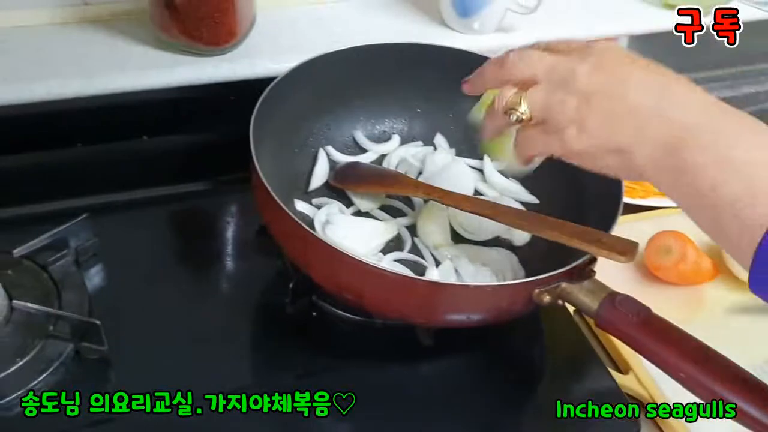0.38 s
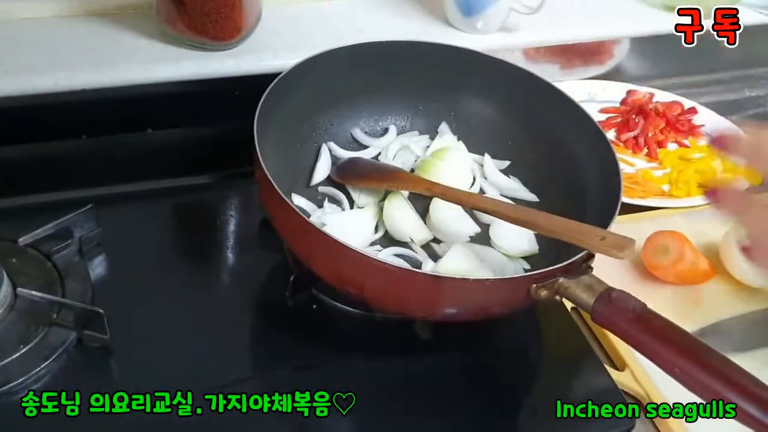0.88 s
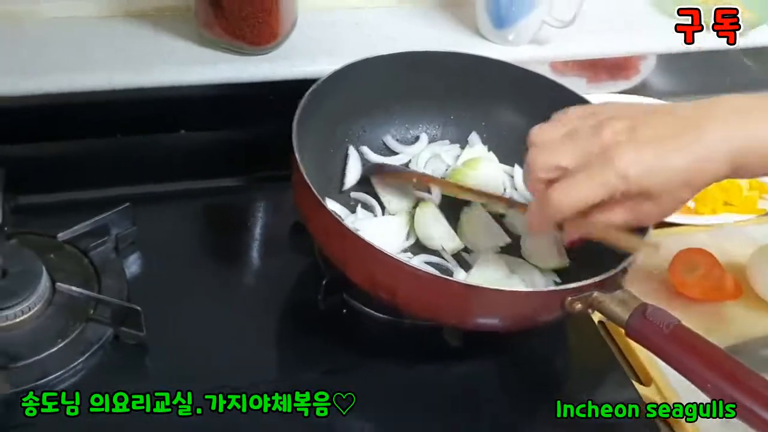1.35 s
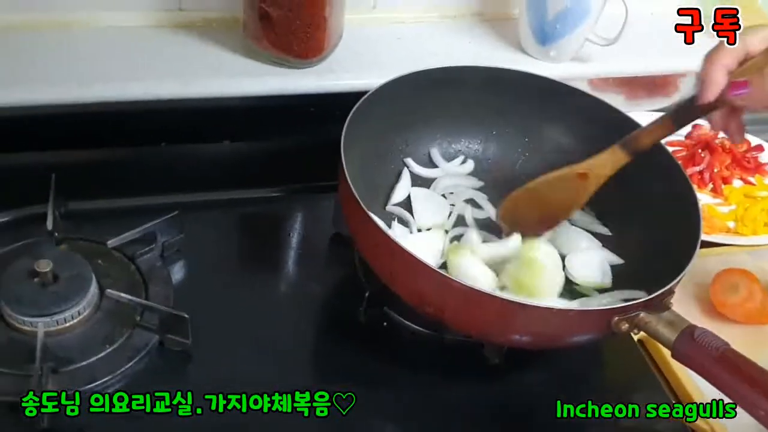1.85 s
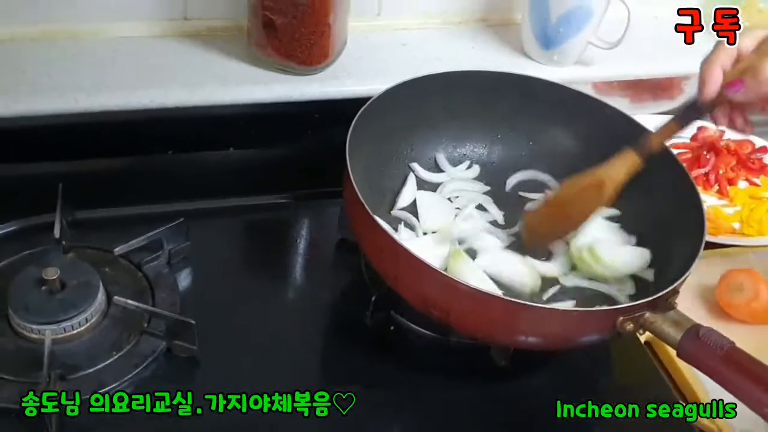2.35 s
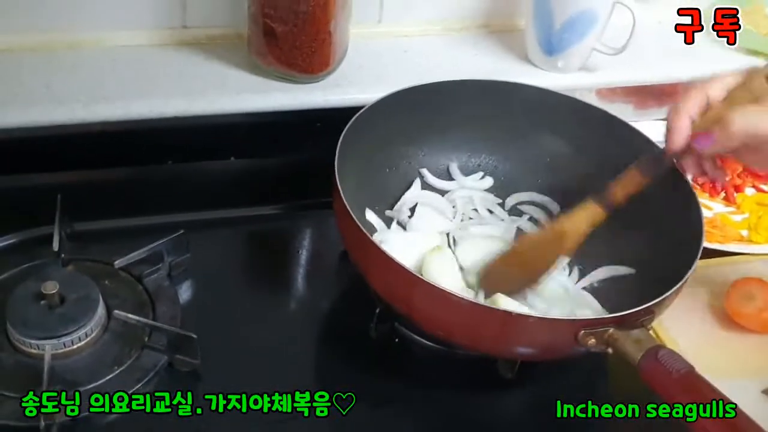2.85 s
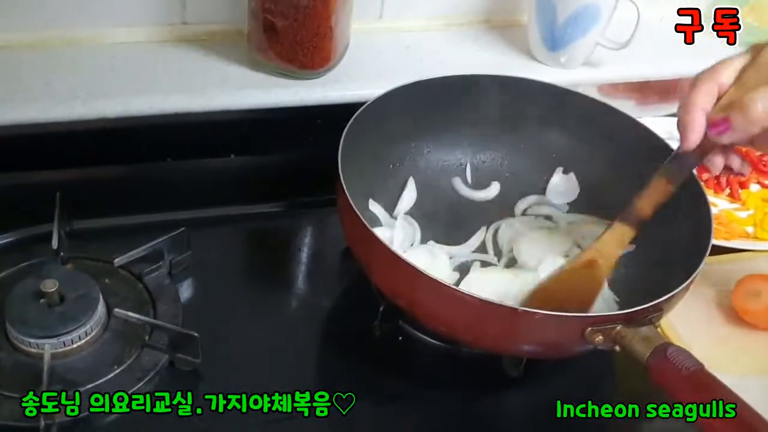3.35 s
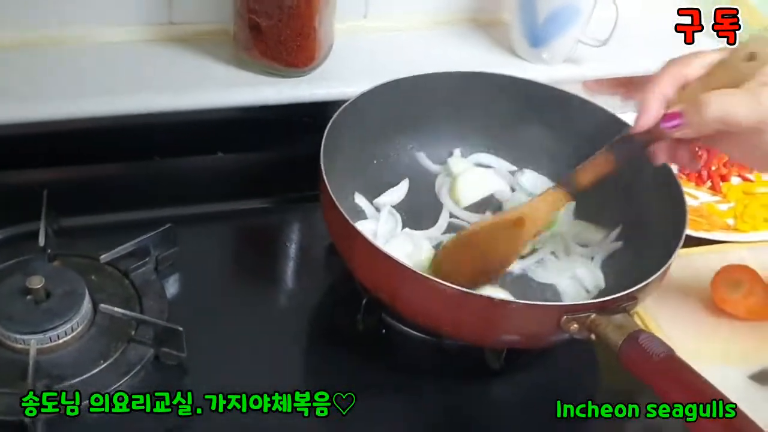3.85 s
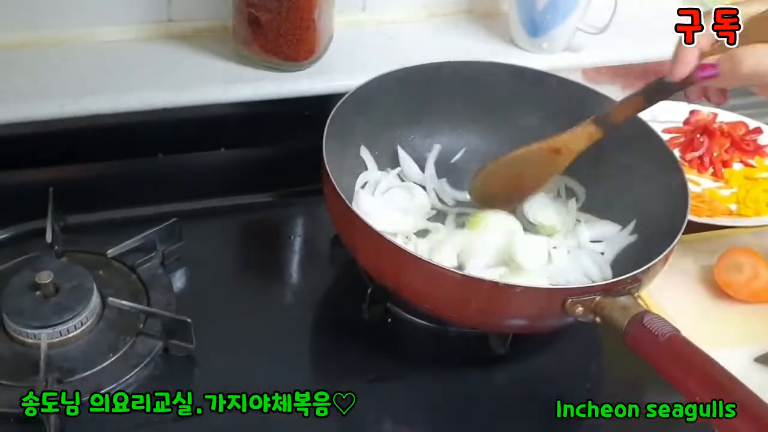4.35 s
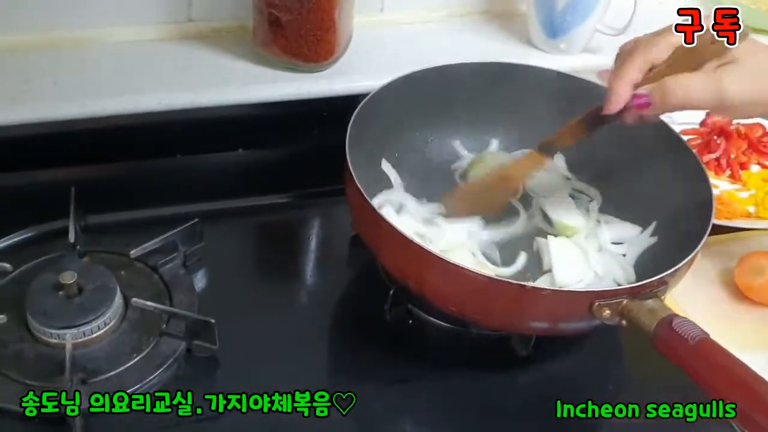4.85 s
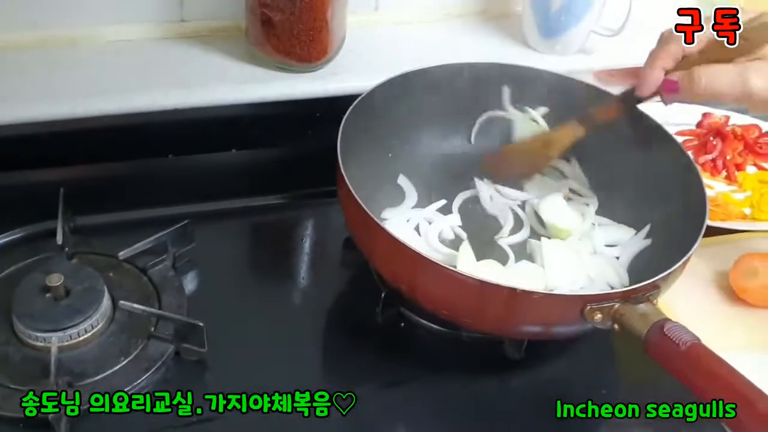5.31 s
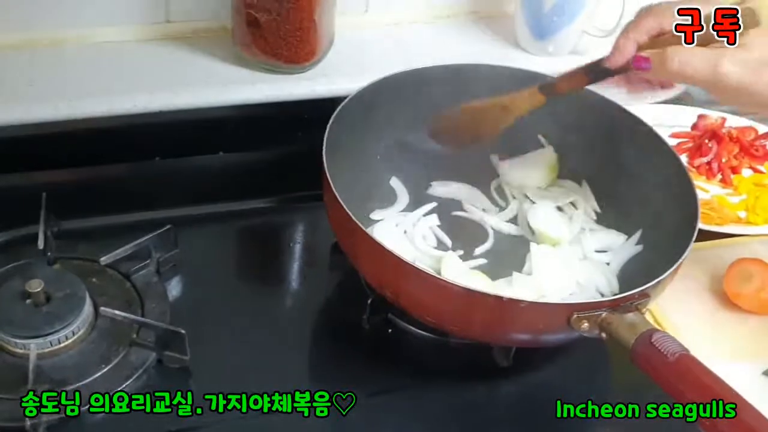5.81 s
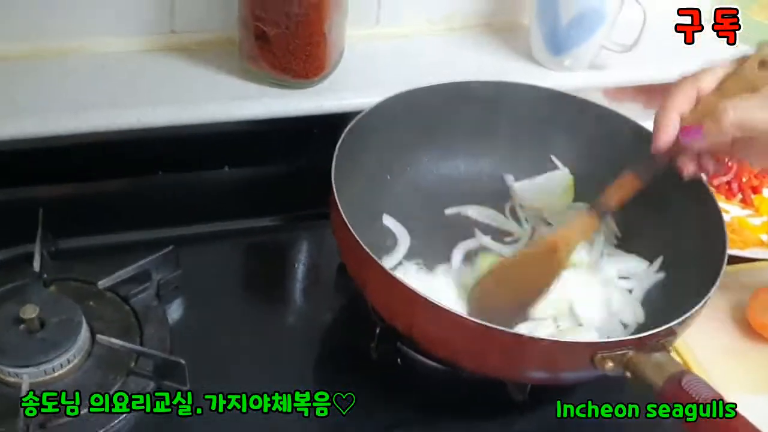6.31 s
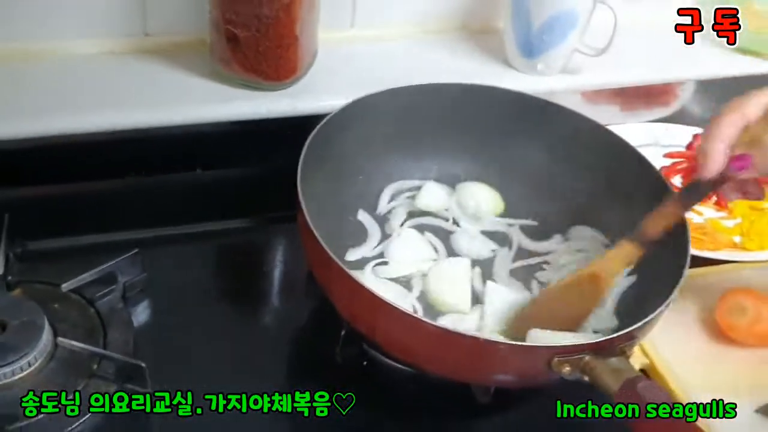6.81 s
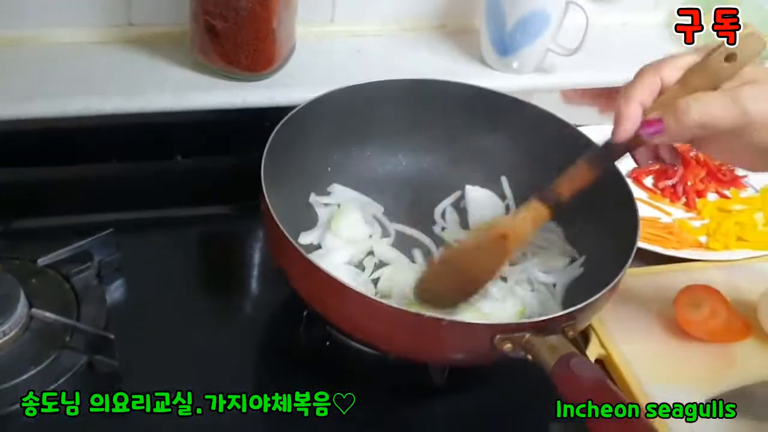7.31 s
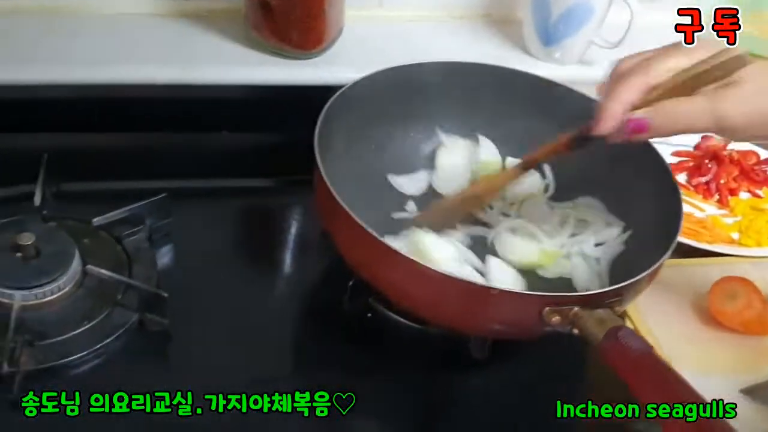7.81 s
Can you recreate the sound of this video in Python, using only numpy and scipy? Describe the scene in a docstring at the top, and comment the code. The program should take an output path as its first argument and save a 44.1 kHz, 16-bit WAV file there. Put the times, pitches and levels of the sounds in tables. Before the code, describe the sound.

Sliced onions sizzle in hot oil with dense crackle and loud spits while wood knocks a ringing metal pan in a small kitchen.

```python
"""Sliced onions sizzle in hot oil: dense crackle over hiss, with a few loud spits. The place is a small
kitchen with a deep frying pan on a gas stove, a phone close by. The sizzle is random clicks bouncing in
the pan plus noise; spits are short bursts of filtered noise. Onion lumps and a wooden spatula knock the pan,
which rings briefly as decaying modes; stirring shoves it on its stand and rumbles the stove top, as noise
through resonances and decaying low tones. A faint murmur of room and burner lies below."""
import sys
import numpy as np
from scipy import signal
from scipy.fft import rfft, irfft, next_fast_len
from scipy.io import wavfile
from scipy.ndimage import uniform_filter1d

SR = 44100
rng = np.random.default_rng(int(sys.argv[2]) if len(sys.argv) > 2 else 0)


def elevation(decibels):
    """Turn decibel levels (scalar or array-like) into linear amplitude ratios."""
    levels = np.asarray(decibels, float)
    return 10 ** (levels / 20)


def waveform_to_disk(signal):
    """Save audio, clipped to [-1, 1], as 16-bit WAV at the path in sys.argv[1]."""
    frames = np.transpose(np.atleast_2d(signal))
    scaled = np.clip(frames, -1, 1) * 32767
    samples = np.round(scaled).astype(np.int16)
    wavfile.write(sys.argv[1], SR, samples)


N = 360738
TIME = np.arange(N) / SR

# Sizes of steam bubble, large to fine: pitch_hz [Hz], width_oct [octaves],
# bursts_per_s [1/s, before the flurries], crackle_db [dB, before the crackle setting is added]
BUBBLE_SIZES = [(1970, 0.92, 250, 4), (2930, 1.11, 45, 0.5), (3970, 1.9, 340, 0.5), (8700, 0.61, 600, 11.5),
                (12290, 0.31, 760, 14)]
LOUDEST_BURST_DB = 12  # over the faintest


def sizzle(spread_db=5.0, crackle_db=-1, flurry_db=2.5, shared=0.26, flicker_db=3.5, surge_db=0.84, spots=5):
    """Bubbles of each size burst in flurries, mostly faint and some loud; the finest merge into hiss."""
    out = 0
    boil = walk(13)
    for pitch_hz, width_oct, bursts_per_s, size_db in BUBBLE_SIZES:
        chance, sign, strength = rng.random((3, N))
        flurry = elevation(flurry_db * (shared * boil + walk(45)))
        bursts = (chance < bursts_per_s * flurry / SR) * np.sign(sign - .5)
        burst_db = np.minimum(-spread_db * np.log(strength + 1e-9), LOUDEST_BURST_DB)
        clicks = bursts * elevation(burst_db)
        # each spot of the pan bounces its bursts its own way
        spot = rng.integers(spots, size=N)
        crackle = sum(bowl(clicks * (spot == k), 2.9, 0.07) for k in range(spots))
        crackle = level(crackle, crackle_db + size_db)
        hiss = rng.standard_normal((2, N)) * elevation(flicker_db * walk(25))
        # bubbles of one size swell and ebb together
        surge = elevation(surge_db * walk(17))
        band = lambda f: np.exp(-(np.log2(f / pitch_hz) / width_oct) ** 2)
        out = out + shape(surge * (crackle + hiss), band)
    return out


def bowl(clicks, echo_db, t60):
    """Clicks and their bounce inside the pan, as a mid and a side signal."""
    bounce = elevation(echo_db) * tail(t60, 0.002)[:, :SR // 8]
    bounce[:, 0] = 1, 0.33 * rng.standard_normal()  # the direct click
    return signal.fftconvolve(clicks[None], bounce, axes=1)[:, :N]


# Water drops spitting in the oil: start_s [s], middle_db [dB, peak near 7.5 kHz],
# low_db [dB, peak near 3 kHz], high_db [dB, peak near 12.5 kHz], pan_db [dB, left minus right]
SPIT_DROPS = [(0.045, -12.5, -21.5, -10.5, 4), (0.1364, -14, -18, -28, 0), (0.22, -15, -31, -26, 5),
              (0.3844, -16, -23, -27, 8), (0.8024, -21, -32, -18, 3.5), (0.9027, -23, -17, -21, 5),
              (0.9334, -15, -28, -28, 2.5), (0.995, -17, -18, -28, 0), (1.024, -17, -13, -28, 2),
              (1.121, -14, -30, -26, 0), (1.4, -12.5, -23, -27, 3), (1.5804, -24, -18, -26, 3.0),
              (1.6108, -18, -15, -25, 5), (1.732, -13, -31, -25, 0), (1.824, -12, -15, -22, 3.5),
              (1.832, -24, -19, -13, 2), (1.935, -21, -17, -27, 1), (1.9819, -18, -32, -9, 0),
              (2.1518, -7.5, -10.5, -25, 2), (2.5065, -9, -19, -24, 0), (3.0515, -13, -11.5, -24, 5),
              (3.0567, -7, -18, -22, 11), (3.1834, -24, -20, -13, 3.5), (3.264, -10, -24, -22, 9),
              (3.3518, -17, -16, -20, -3), (3.7223, -9, -15, -23, 3.5), (3.608, -24, -29, -8, 2),
              (3.767, -22, -12, -20, -3), (3.9024, -12, -15, -8.5, 5), (4.0224, -15, -22, -23, -4),
              (4.0976, -9, -13, -18, 2.0), (4.1586, -6, -9, -22, -2), (4.2136, -11, -21, -22, 4),
              (4.329, -21.5, -24, -23, 0), (4.4197, -13, -20, -26, 0), (4.463, -24, -13, -22, -2),
              (4.559, -16, -29, -23, 2), (4.609, -18, -12.5, -24, 2.5), (4.7007, -13, -19, -25, 0),
              (4.7844, -23, -21, -24, 2.5), (4.881, -8, -12, -5, 7), (5.2475, -16, -20, -24, 3.0),
              (5.3218, -20, -17, -11, 1), (5.4456, -20, -25, -19, 3.5), (5.584, -17, -19, -25, 1.0),
              (6.054, -17, -18, -26, 2), (6.0692, -2, -10.5, -5, 2), (6.531, -7, -32, -6, 3.5),
              (6.561, -16, -31, -10, 2), (6.8905, -26, -20, -27, 0), (7.0429, -12, -26, -15, 5),
              (7.185, -12, -30, -19, 3.5), (7.373, -8.5, -13, -24, 4), (7.647, -9.5, -17, -16, -3),
              (7.67, -4.5, -9.5, -7, -1), (7.8554, -11, -16, -9, 1), (8.0341, -22, -27, -16, 3.5),
              (8.14, -15, -29, -22, 3.5)]
# Middle, low and high part of a spit: from_hz [Hz], to_hz [Hz]
SPIT_RANGES = [(5660, 9300), (1850, 5140), (10400, 14100)]


def spits():
    """A sharp click followed by some ms of spatter, each drop with its own colour."""
    out = np.zeros((2, N))
    t = np.arange(int(0.052 * SR)) / SR
    click = np.exp(-(t / 0.00083) ** 2)
    spatter = elevation(-12) * (t > .002) * np.exp(-(t / 0.011) ** 4)
    bands = [signal.butter(2, edges, "band", fs=SR, output="sos") for edges in SPIT_RANGES]
    for start_s, middle_db, low_db, high_db, pan_db in SPIT_DROPS:
        noise = rng.standard_normal((2, len(t))) * (click + spatter)
        parts = [signal.sosfilt(band, noise) for band in bands]
        levels_db = middle_db, low_db, high_db
        mid, side = sum(elevation(db) * x / np.max(np.abs(x[0])) for x, db in zip(parts, levels_db))
        left = elevation(pan_db / 2) * (mid + 0.58 * side)
        right = elevation(-pan_db / 2) * (mid - 0.58 * side)
        add(out, np.array([left + right, left - right]) / 2, start_s)
    return out


# The course of the frying: start_s [s], level_db [dB, finer bubbles],
# large_db [dB, larger bubbles against level_db]
FRYING_COURSE = [(0.0, -29, -10.5), (0.36, -28.5, -9.5), (0.84, -26.5, -10), (1.34, -27.5, -11.5),
                 (1.98, -26, -7.5), (2.8, -25, -6.5), (3.44, -22, -8), (3.67, -22.5, -10),
                 (3.89, -24.5, -8.5), (4.15, -24, -9), (5.49, -24.5, -8), (6.04, -27, -9),
                 (6.33, -26, -9.5), (6.58, -23.5, -10.5), (8.18, -24.5, -8)]
# Colour of the sizzle at the middle: pitch_hz [Hz], level_db [dB per Hz, before the colour share]
MIDDLE_COLOUR = [(560, -51), (920, -7.5), (1060, -4), (1420, -11.5), (1760, -5.5), (2110, -5.5),
                 (2340, -9.5), (2560, -8.5), (3110, -8.5), (4640, -1.5), (6160, -5.5), (6800, -6.5),
                 (7740, -1.5), (8600, -13.5), (9840, -15), (11300, -14), (12100, -9), (14500, -7)]
# Colour of the sizzle at the sides: pitch_hz [Hz], level_db [dB per Hz, before the colour share]
SIDE_COLOUR = [(560, -24), (950, -6.5), (1060, -7.5), (1290, -14.5), (1760, -10), (1900, -11),
               (2450, -14.5), (3610, -5), (6310, -3), (7570, -5.5), (10100, -26), (12200, -18),
               (14500, -19)]
SIZZLE_SIDE_DB, TOP_HZ = 0.5, 14700


def frying():
    """Sizzle in the colour of pan and microphone, on its curve, plus spits; all ends above TOP_HZ."""
    start_s, level_db, large_db = np.transpose(FRYING_COURSE)
    mid, side = sizzle()
    bed = np.array([colour(mid, MIDDLE_COLOUR), elevation(SIZZLE_SIDE_DB) * colour(side, SIDE_COLOUR)])
    large = shape(bed, lambda f: 1 / (1 + (f / 4200) ** 4))
    fine = bed - large
    # the larger bubbles gain as wet faces turn onto the metal
    curves = (fine, level_db), (large, level_db + large_db)
    bed = sum(x * elevation(np.interp(TIME, start_s, db)) / np.std(x[0]) for x, db in curves)
    return shape(bed + spits(), lambda f: 1 / (1 + (f / TOP_HZ) ** 80))


# Blows on the pan: start_s [s], level_db [dB, that the parts of the blow refer to],
# pitch_hz [Hz, strongest mode], hard_db [dB, bright over dull], ring_db [dB, against level_db]
PAN_BLOWS = [(0.044, -31, 1630, -17, -13), (.385, -19.5, 1900, 22, -27), (0.441, -22, 1440, -7, -3),
             (0.447, -15.5, 930, -7, -3), (.458, -24, 447, -8, 2), (0.489, -25, 930, -17, -6),
             (.682, -27, 1810, -8, -6), (0.6948, -7, 581, 2, -11), (.701, -6.5, 1249, 0, 2),
             (.705, -8, 1145, -4, -5), (0.709, -14, 1249, -3, 0), (0.717, -12.5, 447, -7, -8),
             (.741, -11.5, 410, 12, -12), (0.745, -9.5, 1440, 2, -5), (.754, -15, 1730, -3, -5),
             (.762, -16.5, 447, -15, -2), (0.728, -15, 543, -2, -4), (.775, -25, 1836, -2, 2),
             (.804, -31, 543, -11, -2), (0.822, -31, 410, -4, 8), (0.785, -23, 447, -16, 2),
             (0.902, -20, 2030, 14, 2), (0.932, -21, 1770, 30, 1), (1.03, -29, 930, 4, -7),
             (1.287, -32.5, 930, 5, -6), (1.538, -31, 1040, 0, -6), (1.6105, -12, 1040, 22, -15),
             (1.613, -15.5, 581, -11, -7), (1.613, -19.5, 3000, 15, 1.5), (2.007, -14, 2050, 9, 1),
             (2.0246, -8, 1084, 1, -2), (2.028, -18.5, 538, 6, -7), (2.048, -33, 570, 9, 13),
             (2.423, -16.5, 1970, 0, 1.5), (2.479, -29.5, 446, 0, 9.5), (2.508, -10.5, 2490, 5.5, -7),
             (2.577, -24, 447, 5, 3), (2.611, -21.5, 581, -9, 0), (2.619, -17.5, 1040, -6, -5),
             (2.625, -17, 1040, -18, -5), (2.632, -33, 1730, -4, -2), (2.791, -10, 930, 2, -5),
             (2.793, -15.5, 619, -1, -8), (2.81, -21, 690, -6, -4), (3.243, -32, 1040, 6, -1),
             (3.263, -19.5, 1440, 37, 5), (3.344, -8, 1770, 7, -4), (3.346, -14.5, 1040, -4, -9.5),
             (3.704, -13, 1836, 18, 0), (4.483, -14.5, 1280, -4, -2), (4.759, -23.5, 580, -13, -14),
             (5.247, -18, 2170, 28, 3.5), (5.251, -17.5, 3000, 35, 0), (5.3217, -5.5, 1145, 16, -1),
             (5.325, -6.5, 1440, 15, -8), (5.495, -34, 620, 0, -13), (5.574, -15, 930, 16, -4),
             (5.58, -25.5, 447, -2, 2), (5.602, -21.5, 930, -7.5, -1), (5.973, -19, 615, -6, -12),
             (5.975, -19, 1440, 0, 1.5), (6.277, -36, 637, -6, 11.5), (6.391, -37, 930, 0, -9),
             (6.413, -34.5, 930, 11, -10), (6.528, -19, 1880, 1, -22), (6.827, -22.5, 620, -13, -1),
             (7.111, -20.5, 1070, -15, -1), (7.387, -11, 1836, -5, -2), (7.39, -13, 930, -4, -6),
             (7.452, -33, 930, 2, -6), (7.67, -20, 1730, -19, -10), (7.994, -15.5, 1790, -8.5, -4),
             (8.011, -27, 930, 0, -4), (8.046, -33, 820, -4, -7)]
# Ringing modes of the pan: pitch_hz [Hz], level_db [dB, relative], t60_s [s]
PAN_RINGS = [(352, -1.5, .08), (410, -1.5, 0.12), (447, -3.5, 0.2), (538, 5.5, .08), (581, -0.5, 0.16),
             (620, 2, 0.094), (820, 6, 0.023), (930, -6.5, 0.037), (1040, 2, 0.072), (1145, -1.5, .17),
             (1249, -9.5, 0.077), (1440, 2, 0.037), (1730, -1.5, 0.07), (1836, 4, 0.067),
             (2170, 4.5, 0.065), (2490, 4, 0.069), (3000, -12, .04), (4000, -17, 0.034)]
MODE_SCATTER = .003  # spread of the share by which each blow shifts a mode
CONTACT_DB = -8.5  # dull and bright contact noise of a blow of middling hardness
TOCK_DB, TOCK_CYCLES = -8, 4.4  # short note of the striking wood or onion; cycles to fall to a third


def knocks(favour_db=22, scatter_db=2.5):
    """Wood and onion on metal: contact noise, a short tock, and the pan modes near the pitch of the blow."""
    out = np.zeros(N)
    hz, mode_db, t60 = np.transpose(PAN_RINGS)[:, :, None]
    t = np.arange(int(.4 * SR)) / SR
    rise = 1 - np.exp(-(t / .0008) ** 4)  # wood and onion give a little before the full blow
    fade_s = np.array([[.006], [.004], [.003]])
    ranges_hz = (200, 1090), (900, 1900), (1600, 5000)
    bands = [signal.butter(2, edges, "band", fs=SR, output="sos") for edges in ranges_hz]
    for start_s, level_db, pitch_hz, hard_db, ring_db in PAN_BLOWS:
        level_chance, pitch_chance = rng.standard_normal((2, len(hz), 1))
        distance = np.abs(np.log2(hz / pitch_hz)) ** .5
        gain = elevation(mode_db - favour_db * distance + scatter_db * level_chance)
        tones = np.sin(2 * np.pi * hz * (1 + MODE_SCATTER * pitch_chance) * t)
        ring = np.sum(gain * elevation(-60 * t / t60) * tones, axis=0)
        noise = rng.standard_normal((3, len(t))) * np.exp(-t / fade_s)
        contact = [signal.sosfilt(band, x) for band, x in zip(bands, noise)]
        tock = np.sin(2 * np.pi * pitch_hz * t) * np.exp(-t * pitch_hz / TOCK_CYCLES)
        parts = contact + [tock, ring]
        contact_db = [CONTACT_DB - hard_db / 2, CONTACT_DB - 1.5, CONTACT_DB + hard_db / 2]
        gains_db = contact_db + [TOCK_DB, ring_db]
        blow = sum(elevation(level_db + g) * x / np.max(np.abs(x)) for x, g in zip(parts, gains_db))
        add(out, blow * rise, start_s)
    return out


# Heavy pushes of the pan on its stand: start_s [s], peak_db [dB], pitch_hz [Hz]
PAN_PUSHES = [(0.45, -25, 140), (0.478, -35, 118), (0.525, -30, 204.5), (0.707, -19, 108),
              (0.74, -18.5, 94), (0.82, -24, 117), (0.968, -38, 199), (1.639, -28, 189), (2.01, -40, 193),
              (2.424, -17.5, 160), (2.447, -18.5, 136), (2.465, -22, 120), (2.483, -25, 120),
              (2.519, -29, 150), (2.551, -28, 100), (2.602, -19, 150), (2.646, -25, 96.9), (2.801, -37, 92),
              (3.336, -25, 193), (3.48, -36.5, 197), (4.468, -41, 159), (4.733, -32.5, 175),
              (5.055, -32.5, 177), (5.285, -33.5, 190), (6.028, -30, 176), (6.273, -39, 186),
              (6.828, -38, 183), (7.148, -22.5, 163), (7.38, -33, 129), (7.664, -29, 173),
              (7.752, -30.5, 80.7), (7.98, -48, 183)]
# Resonances of the stove top: pitch_hz [Hz], width_hz [Hz], level_db [dB, relative]
STOVE_TOP = [(44.6, 9.4, -4.5), (82, 24, 2.5), (118, 34, -0.5), (151.4, 36, -1), (197.2, 24.6, -1.5),
             (285, 21, -1.5), (362.4, 16.4, -2.5)]


def thuds(favour_db=9):
    """Each heavy push rings the stove top, most near the pitch of the push."""
    out = np.zeros(N)
    hz, width, mode_db = np.transpose(STOVE_TOP[1:])[:, :, None]
    t = np.arange(int(.4 * SR)) / SR
    rise = 1 - np.exp(-t / 0.0022)
    for start_s, peak_db, pitch_hz in PAN_PUSHES:
        gain = elevation(mode_db - favour_db * np.abs(np.log2(hz / pitch_hz)))
        gain = gain * np.sign(rng.standard_normal(hz.shape))
        tones = np.exp(-1.6 * width * t) * np.sin(2 * np.pi * hz * t)
        thud = np.sum(gain * tones, axis=0) * rise
        add(out, elevation(peak_db) * thud / np.max(np.abs(thud)), start_s)
    return out


# Rattle of the pan: pitch_hz [Hz], width_hz [Hz], level_db [dB, relative]
PAN_RATTLE = [(297, 16.7, -33), (436, 6.8, -4.5), (549.6, 100, 1.5), (710.7, 39, 2)]
RUMBLE_FADE_DB_PER_S, RATTLE_FADE_DB_PER_S = 85, 71
REST_RUMBLE_DB, REST_RATTLE_DB = -57, -57.5


def stove(rumble_width=0.23, rattle_width=1.0, patchy_db=4.0):
    """The shoved pan slips and catches on its stand: uneven jolts ring stove top and pan."""
    _, rumble_db, _, rattle_db = np.transpose(PAN_SLIDES)
    jolts = rng.standard_normal((2, N)) * elevation(1.5 * walk(40))
    rumble = resonate(jolts, STOVE_TOP[:5]) * slides(rumble_db, RUMBLE_FADE_DB_PER_S, REST_RUMBLE_DB)
    rumble = rumble * dropouts() * [[1], [rumble_width]]
    # the rattle's level wavers unevenly, separately at each pitch
    rattle = 0
    for hz, width, db in PAN_RATTLE:
        tone = resonate(rng.standard_normal((2, N)), [(hz, width, 0)])
        rattle = rattle + elevation(db + patchy_db * walk(22)) * tone
    rattle = level(rattle, 0) * slides(rattle_db, RATTLE_FADE_DB_PER_S, REST_RATTLE_DB)
    return rumble + rattle * [[1], [rattle_width]]


# The pan slides on its stand: start_s [s], rumble_db [dB], hold_s [s], rattle_db [dB]
PAN_SLIDES = [(0.01, -47.5, 0.27, -53.5), (0.425, -39.5, 0.056, -47), (0.674, -36.5, 0.15, -44),
              (0.952, -47, 0.034, -62), (1.503, -52.5, 0.076, -46.5), (1.64, -45.5, 0.29, -53),
              (1.997, -45.5, 0.12, -46), (2.408, -34, 0.11, -42.5), (2.592, -34.5, 0.074, -43),
              (2.812, -40.5, 0.076, -47), (3.058, -38.5, 0.048, -43), (3.31, -41.5, 0.1, -45.5),
              (3.476, -47.5, 0.049, -67), (3.643, -44.5, 0.096, -48.5), (3.936, -50, 0.28, -53),
              (4.187, -53, 0.29, -50), (4.482, -49, 0.032, -44.5), (4.743, -43, 0.06, -45.5),
              (5.031, -45, 0.14, -58), (5.263, -42, 0.04, -46.5), (5.452, -52, 0.18, -50),
              (6.02, -37.5, 0.016, -47.5), (6.12, -46, 0.021, -54), (6.266, -44, 0.06, -49),
              (6.492, -59, 0.085, -54.5), (6.75, -46, 0.18, -49.5), (7.134, -34, 0.035, -47.5),
              (7.349, -42.5, 0.1, -45), (7.644, -50, 0.19, -52), (7.965, -43.5, 0.031, -48.5)]
SLIDE_ATTACK_S = 0.012


def slides(peaks_db, fade_db_per_s, rest_db):
    """Gain over time: each slide swells, holds and fades into the resting level; powers add."""
    power = elevation(2 * rest_db) + 0 * TIME
    for (start_s, _, hold_s, _), peak_db in zip(PAN_SLIDES, peaks_db):
        t = TIME - start_s
        swell = np.clip(t / SLIDE_ATTACK_S, 0, 1)
        fading_s = np.maximum(t - SLIDE_ATTACK_S - hold_s, 0)
        power = power + (swell * elevation(peak_db - fade_db_per_s * fading_s)) ** 2
    return np.sqrt(power)


# Colour of room and burner: pitch_hz [Hz], level_db [dB per Hz, before the colour share]
KITCHEN_COLOUR = [(60, -4), (120, -0.5), (250, -12.5), (500, -6), (900, -8.5), (1800, -29)]
KITCHEN_DB = -51.5  # rms before its slow wander


def kitchen():
    """The faint murmur of room and burner: coloured noise of wandering level, mid and side."""
    murmur = level(colour(rng.standard_normal((2, N)), KITCHEN_COLOUR, 0.7), KITCHEN_DB)
    return murmur * elevation(3.45 * walk(3.53)) * dropouts() * [[1], [.8]]


# Moments when rumble and murmur dip briefly: middle_s [s], length_s [s]
LOW_DIPS = [(1.472, 0.03), (3.781, 0.13), (4.71, 0.045), (5.892, 0.084), (6.687, 0.017), (7.034, 0.031)]
DROPOUT_DB = -36


def dropouts():
    """Gain that dips where the lows fall away."""
    dips = sum(np.exp(-(2 * (TIME - middle_s) / length_s) ** 4) for middle_s, length_s in LOW_DIPS)
    return elevation(DROPOUT_DB * dips)


def tail(t60, late_s, channels=2):
    """Decaying noise of unit energy after a gap: many close reflections."""
    t = np.arange(int(.5 * SR)) / SR - late_s
    x = rng.standard_normal((channels, len(t))) * elevation(-60 * t / t60) * (t > 0)
    return x / np.sqrt(np.sum(x ** 2, axis=1, keepdims=True))


def level(x, db):
    """Scale to an rms level."""
    return x * elevation(db) / np.sqrt(np.mean(x ** 2))


def shape(x, gain):
    """Filter by a gain given as a function of frequency."""
    size = next_fast_len(N)
    hz = np.maximum(np.arange(size // 2 + 1) * SR / size, 1)
    return irfft(rfft(x, size) * gain(hz), size)[..., :N]


def colour(x, points, share=0.68):
    """Filter by a share of the dB given at points of (Hz, dB)."""
    hz, db = np.transpose(points)
    return shape(x, lambda f: elevation(share * np.interp(np.log(f), np.log(hz), db)))


def resonate(x, peaks):
    """Sum of steep (Hz, width Hz, dB) resonances, rms 1."""
    def gain(f):
        return sum(elevation(db) / (1 + 1j * (f / hz - hz / f) * hz / width) ** 2 for hz, width, db in peaks)
    return level(shape(x, gain), 0)


def walk(rate):
    """Random levels held 1 / rate s and slewed twice; spread near 1."""
    k = int(SR / rate)
    steps = np.repeat(rng.standard_normal(N // k + 1), k)
    return 1.1 * uniform_filter1d(uniform_filter1d(steps, k), k)[:N]


def add(track, sound, start_s):
    """Lay a sound into the track at a time."""
    i = int(start_s * SR)
    track[..., i:i + sound.shape[-1]] += sound[..., :N - i]


ROOM_T60_S, ROOM_DB = 0.23, -6


def scene():
    """Left and right of all sources; the blows also sound, duller, in the small room."""
    blows = knocks()
    dull = shape(blows, lambda f: 1 / (1 + 1j * f / 2500))
    room = signal.fftconvolve(dull[None], tail(ROOM_T60_S, 0.0019), axes=1)[:, :N]
    # a quarter-turned copy at the sides widens the blows
    wide_blows = np.array([blows, shape(blows, lambda f: .45j + 0 * f)])
    pushes = thuds() * [[1], [.05]]
    mid, side = frying() + stove() + kitchen() + elevation(ROOM_DB) * room + wide_blows + pushes
    return np.array([mid + side, mid - side])


def drop_faint_lows(x, under_db=-30.5, deep_spared_db=5, size=2048, count=8, bands=8):
    """Bands below about 1.4 kHz fall silent while they lie far under the whole sound."""
    _, _, z = signal.stft(x, SR, nperseg=size)
    power = np.mean(np.abs(z) ** 2, axis=0)
    low = power[:count * bands].reshape(bands, count, -1).sum(axis=1)
    whole = uniform_filter1d(power.sum(axis=0), size=5)
    margin_db = 10 * np.log10(low / whole + 1e-12) - under_db
    margin_db[0] += deep_spared_db  # the deepest band is spared longer
    z[:, :count * bands] *= np.repeat(np.clip(.5 + margin_db, 0, 1), count, axis=0)
    return signal.istft(z, SR, nperseg=size)[1][:, :N]


def band_limit(x):
    """A steep low-pass at the top of the band."""
    return signal.sosfilt(signal.butter(12, 15870, fs=SR, output="sos"), x)


# Colour difference of the two microphones: pitch_hz [Hz], lean_db [dB, left minus right]
MICROPHONE_LEAN = [(60, 0.5), (110, -0.5), (200, -1), (380, -1), (700, -1), (1290, 1), (2380, 2), (4400, 0),
                   (8120, 3.5), (15000, -2.5)]


def record(dry):
    """Two microphones differ in colour; loudest peaks are rounded, low bands far under the whole fall silent."""
    x = np.array([colour(dry[0], MICROPHONE_LEAN, .5), colour(dry[1], MICROPHONE_LEAN, -.5)])
    rounded = np.sign(x) * (.5 + .5 * np.tanh(2 * np.abs(x) - 1))
    x = np.where(np.abs(x) < .5, x, rounded)
    return band_limit(drop_faint_lows(x))


dry = scene()
out = record(dry)
waveform_to_disk(out)
```